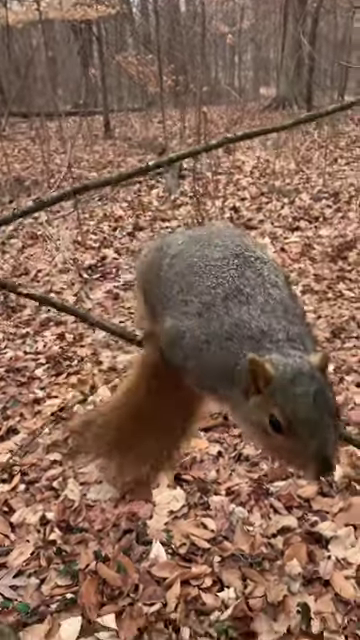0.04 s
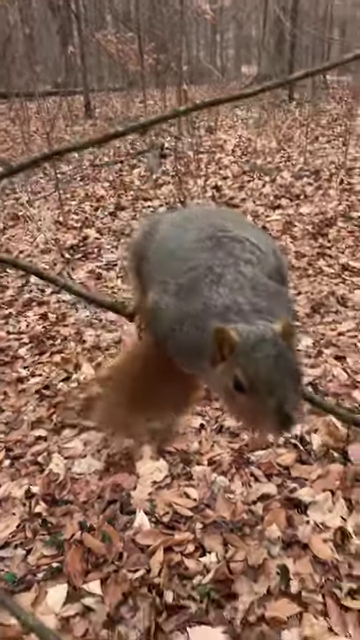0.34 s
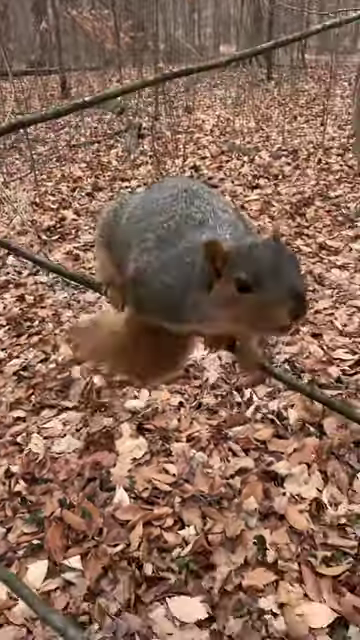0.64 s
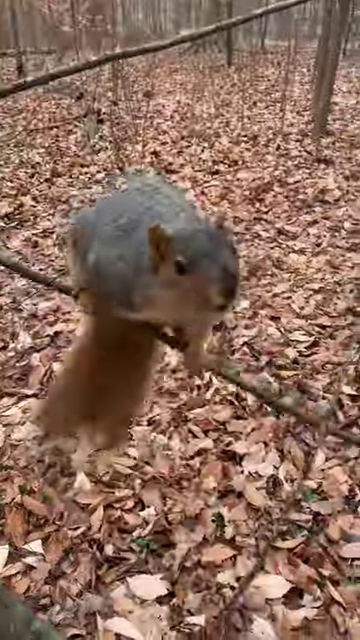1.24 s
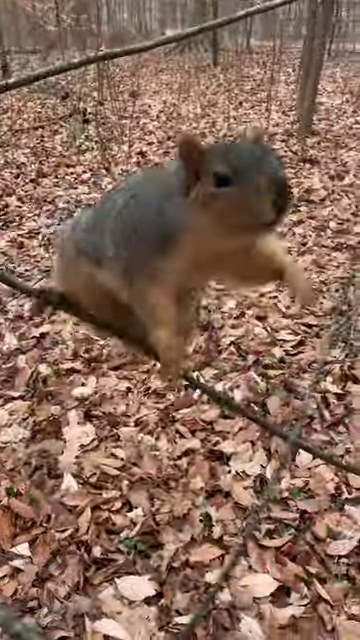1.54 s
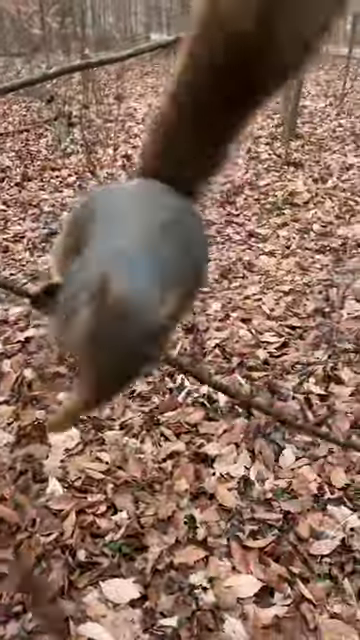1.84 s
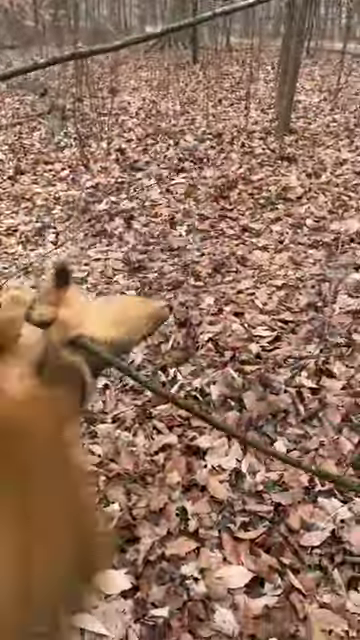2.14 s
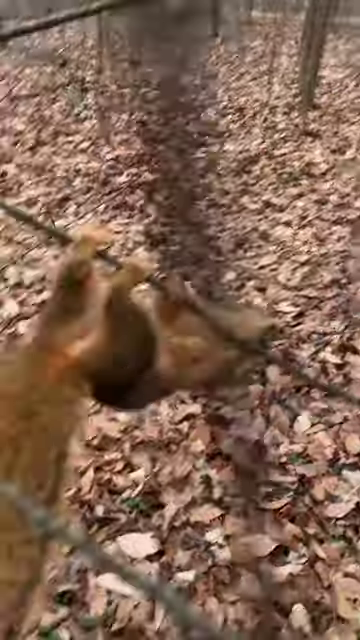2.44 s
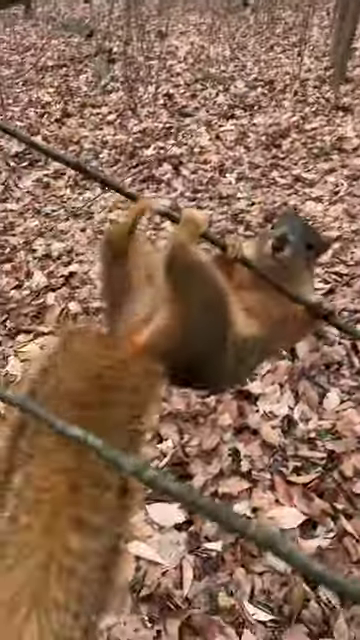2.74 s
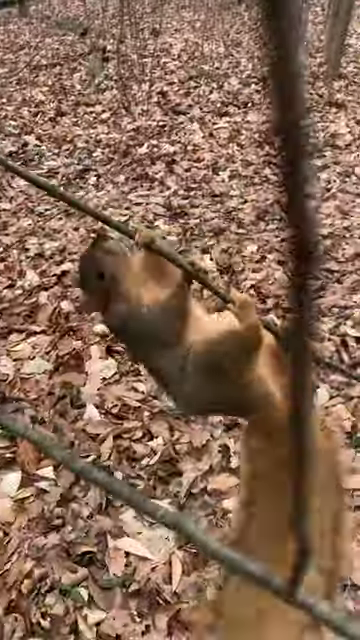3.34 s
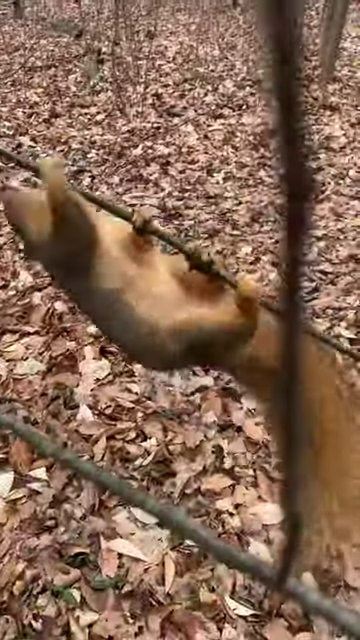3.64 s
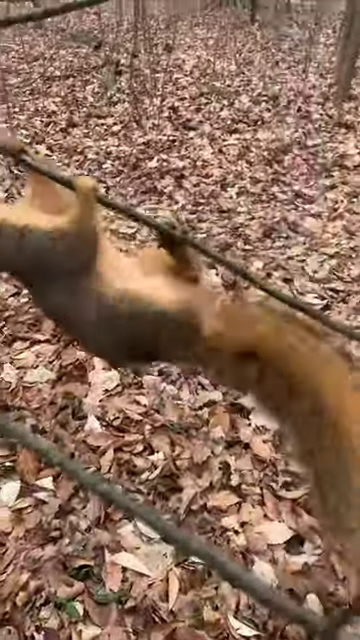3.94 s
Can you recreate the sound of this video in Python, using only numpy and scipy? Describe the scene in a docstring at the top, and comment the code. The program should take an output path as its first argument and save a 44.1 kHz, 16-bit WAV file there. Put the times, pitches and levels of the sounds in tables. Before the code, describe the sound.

A squirrel's claws tick and scrape on a thin branch close by, lightly at first, then in a sharp flurry with a woody knock, and once more later. Leaves rustle faintly and distant traffic rumbles through the forest.

```python
"""A squirrel scrambles along a thin branch close by. Its claws tick as they catch the bark,
its paws scrape and pat, bits of bark split, and its landing makes the wood ring with a knock.
Fur and dry leaves hiss faintly, and a thin rasp comes from the trees near the end.
Far traffic rumbles through the bare forest, and one engine drones in and out."""
import sys
import numpy as np
from scipy import signal
from scipy.fft import rfft, irfft, next_fast_len
from scipy.io import wavfile
from scipy.ndimage import uniform_filter1d, map_coordinates

SR = 44100
rng = np.random.default_rng(int(sys.argv[2]) if len(sys.argv) > 2 else 0)


def persist_wave(psi):
    """Save psi, clipped to +-1, as 16-bit WAV."""
    counts = np.round(np.clip(psi, -1, 1) * 32767).astype(np.int16)
    wavfile.write(sys.argv[1], SR, np.atleast_2d(counts).T)


N = 176400  # 4 seconds

# Below, t is time, f is frequency and t60 is the time a sound takes to fade by 60 dB.
# Bark noise has three parts: a bright snap, a woody body and a glassy edge. Levels are relative.
# claws catching the bark (t/s, snap/dB, body/dB, edge/dB, t60/s)
CLAW_TICKS = [(.617, -60, -44.5, -63.5, .03), (1.11, -45, -48, -37.5, 0.016),
              (1.655, -43.5, -48, -65, 0.039), (1.688, -45, -43, -68, 0.029), (1.8574, -29, -39, -43, 0.02),
              (1.8964, -40, -24, -52.5, 0.018), (1.9257, -35, -47, -51, .015),
              (1.9432, -17.5, -29.5, -18.5, .017), (1.9852, -18.5, -24, -30, 0.017),
              (2.1328, -36, -45.5, -43, 0.021), (2.296, -47, -52, -46.5, 0.022),
              (2.3095, -45.5, -55, -40.5, .02), (2.361, -38, -47, -42, 0.014),
              (2.388, -41.5, -60, -43.5, 0.025), (2.4374, -31.5, -51, -39.5, .009),
              (2.477, -37, -53, -44, 0.045), (2.575, -41, -59, -41.5, 0.018), (2.6053, -28, -60, -36, 0.02),
              (2.6086, -38, -60, -42, .025), (2.625, -36.5, -47, -47, .025),
              (2.635, -38.5, -55, -46, 0.021), (2.696, -46.5, -55, -44.5, 0.055),
              (3.0107, -29.5, -30, -36, .012), (3.072, -37.5, -37, -52, 0.05),
              (3.0942, -16.5, -22.5, -40.5, 0.0094), (3.443, -44.5, -60, -64, .012),
              (3.464, -46.5, -57, -60, 0.011), (3.5445, -45, -70, -60, 0.013),
              (3.844, -47, -66, -65, 0.013)]
# notes a claw rings on, with levels relative to its snap (f/Hz, level/dB, t60/s)
CLAW_NOTES = [(7400, -14, 0.017), (8750, -3, 0.006), (9500, -13, 0.026)]
# paws sliding over bark (t/s, length/s, snap/dB, body/dB, edge/dB, t60/s)
PAW_SLIDES = [(0.583, 0.031, -67, -51, -68, .15), (1.097, 0.023, -59, -50.5, -66, 0.081),
              (1.225, 0.036, -63, -53.5, -70, 0.16), (1.411, 0.014, -65, -55, -75, .06),
              (1.682, .023, -59, -55, -76, .1), (1.852, 0.015, -51, -41, -55.5, .07),
              (1.881, 0.028, -52.5, -36.5, -50, 0.095), (1.962, 0.044, -48, -41.5, -50.5, .08),
              (2.129, 0.0092, -45, -47, -47, .051), (2.218, 0.025, -52.5, -52, -70, .084),
              (2.291, .045, -57, -71, -52, 0.29), (2.382, 0.024, -54, -50.5, -51, .06),
              (2.442, 0.046, -49, -47.5, -57, 0.13), (2.6, 0.057, -50.5, -47, -46.5, 0.17),
              (2.812, 0.0087, -49.5, -69, -53, 0.041), (3.0109, 0.014, -30, -31.5, -36, 0.077),
              (3.043, 0.039, -49, -43, -43.5, 0.11), (3.091, 0.014, -32, -30, -35.5, 0.057),
              (3.12, 0.0079, -53, -56.5, -48.5, 0.066), (3.197, 0.022, -51, -55, -75, .12),
              (3.429, 0.037, -59, -66, -71, .1), (3.832, 0.042, -58, -75, -82, .092)]
# tone colours of the three parts of bark noise (f/Hz, level/dB)
SNAP_COLOUR = [(2500, -32), (4000, -17), (5300, 4), (7000, 0.5), (8400, 4), (9600, -9), (11300, -8),
               (13000, -16.5), (15500, -19.5), (16500, -40.5)]
BODY_COLOUR = [(200, -22), (700, -9.5), (1300, -10), (2050, -0.5), (2450, -5.5), (3000, 2.5), (3650, -2),
               (4600, 1.5), (5600, 0), (7500, -29.5)]
EDGE_COLOUR = [(7000, -17), (10000, -4), (12500, -2), (14500, -2), (15800, -1), (16800, -10)]
# bark splitting under the hardest grips (t/s, f/Hz, level/dB, t60/s)
BARK_CRACKS = [(1.8962, 2830, -26, .035), (1.897, 3995, -18.5, 0.023), (1.925, 3150, -35, .025),
               (1.944, 4080, -21.5, 0.018), (1.9438, 8400, -12, 0.014), (1.9841, 3320, -20, 0.015),
               (2.696, 3140, -43, 0.035), (3.093, 3660, -21, 0.03), (3.101, 2850, -37, 0.056)]
# blows on the branch: landing, rebound, a later grab (t/s, level/dB, extra for low notes/dB)
BRANCH_BLOWS = [(1.8955, -11.5, 2.5), (1.9249, -21, -4), (3.095, -33.5, 5)]
# notes the branch makes as it bends back and forth (f/Hz, level/dB, t60/s)
BRANCH_NOTES = [(96.3, 11.5, 0.054), (152, 1, 0.094), (274.5, 3.5, 0.039), (787, -1.5, 0.047),
                (1310, -5, 0.031), (1833, -10.5, 0.013), (4085, -6, 0.0089)]
# soft paw pads set down on the wood (t/s, level/dB, t60/s)
PAD_STEPS = [(0.617, -32.5, .04), (2.1616, -28.5, 0.038), (3.011, -31.5, 0.057)]
# dull tone colour of a pad (f/Hz, level/dB)
PAD_COLOUR = [(40, -20), (110, -7), (250, 6.5), (400, 9.5), (800, 2.5), (1400, -4.5), (2100, -3),
              (3000, -15), (5000, -50), (8000, -52)]
# loudness of fur and dry leaves (t/s, treble/dB, upper mids/dB)
RUSTLE_LEVELS = [(0, -66, -54.5), (.55, -62, -57), (.68, -66.5, -49.5), (.8, -65, -57.5), (.88, -62, -50),
                 (1.05, -61, -55), (1.35, -63.5, -60.5), (1.82, -63.5, -53.5), (2.0, -53, -60),
                 (2.07, -57, -52), (2.17, -52.5, -50), (2.45, -55.5, -54), (2.55, -56, -51.5),
                 (2.85, -58, -55), (2.97, -61.5, -61), (3.13, -43.5, -49.5), (3.27, -55.5, -48.5),
                 (3.4, -59, -56.5), (3.73, -64.5, -52.5), (3.85, -69, -50.5), (4, -58, -52.5)]
# tone colours of the rustle's treble and upper mids (f/Hz, level/dB)
RUSTLE_TREBLE = [(2500, -32), (4000, 5), (5300, -1.5), (7000, 1.5), (8400, -1), (9600, -6.5), (11300, -9.5),
                 (13000, -10), (15500, -24.5), (16500, -23)]
RUSTLE_MIDS = [(1200, 3.5), (2200, 5), (3300, 3), (4200, -8), (5600, -27.5), (7500, -25.5)]
# narrow tone colour of the rasp (f/Hz, level/dB)
RASP_COLOUR = [(2300, -30), (2900, -9), (3100, -1), (3330, 0), (3500, -10), (4300, -30)]
# rise and fall of the road's rumble (t/s, level/dB)
RUMBLE_LEVELS = [(0, -26.5), (.13, -28.5), (.5, -29.5), (.9, -30.5), (1.5, -29.5), (1.7, -31.5), (2.1, -34),
                 (2.25, -32.5), (2.55, -29.5), (2.95, -32.5), (3.3, -29.5), (3.9, -30.5)]
# tone colours of the road's rumble and the tyres' roar (f/Hz, level/dB)
RUMBLE_COLOUR = [(14, -61), (21, -23.5), (46, -4), (76, 2.5), (150, -8.5), (173, -9.5), (198, -12.5),
                 (255, -22), (344, -25), (400, -35), (520, -43), (880, -120)]
TYRE_COLOUR = [(100, -16.5), (250, 3.5), (380, -2), (520, 2.5), (720, -1.5), (1000, -5), (1500, -9.5),
               (2000, -18.5), (2600, -30), (4000, -43.5), (5300, -90), (9000, -45.5)]
# the far engine's firing rate and loudness (t/s, f/Hz, level/dB)
ENGINE_RUN = [(0, 93.5, -38), (2.15, 96.74, -45), (2.3, 98.6, -35.5), (2.6, 101.7, -33.5),
              (2.67, 100.9, -25), (2.82, 104.4, -27), (2.86, 104.5, -45), (3.29, 104.4, -37.5),
              (3.335, 105.1, -29.5), (3.41, 105.2, -24), (3.495, 105.6, -22), (3.515, 106.3, -30),
              (3.57, 107.1, -24), (3.83, 108.1, -26.5), (3.92, 107.2, -23), (4, 100, -24.5)]
# the engine's tones at 1 to 5 times its firing rate (level/dB)
ENGINE_TONES = [0.5, -21, -30, -34, -34]
# how alike left and right are: 1 is the same, -1 is opposite (f/Hz, likeness)
NEAR_LIKENESS = [(500, 0.92), (1800, 0.92), (3000, -0.39), (4100, -0.12), (4800, -0.97), (5300, -0.99),
                 (5900, -0.87), (6500, 0.11), (7500, 1), (8500, 0.94), (9400, 0.96), (10300, -0.16),
                 (11400, -0.97), (12500, -0.064), (14000, 0.99), (15500, 0.75)]  # two microphone openings agree and cancel in turn as f rises
AIR_LIKENESS = [(60, 1), (125, 1), (250, 0.86), (500, 0.52), (1000, 0.5), (2500, 0.42), (4000, -0.3),
                (5300, -1), (8000, 0.53)]  # the same in the bass, less alike higher up


def claws():
    """Each claw slips briefly, then catches with a dry tick that rings for a moment."""
    snap, body, edge, ringing = np.zeros((4, N))
    for start, snap_db, body_db, edge_db, t60 in CLAW_TICKS:
        slip = gain(-12.5) * envelope(start, rise_s=0.0046, hold_s=0, t60=t60)
        catch = envelope(start, rise_s=0.00053, hold_s=0.0007, t60=t60)
        shape = slip + catch
        snap += gain(snap_db) * shape
        body += gain(body_db) * shape
        edge += gain(edge_db) * shape
        ringing += claw_ring(start, snap_db)
    return bark(snap, body, grain_db=-1.0) + edge * noise(EDGE_COLOUR, NEAR_LIKENESS) + ringing


def claw_ring(start, snap_db):
    """A struck claw rings on a few high, fading notes, a little different each time."""
    out = np.zeros(N)
    t = np.arange(SR // 25) / SR
    for hz, level_db, t60 in CLAW_NOTES:
        detune, size_db = rng.standard_normal(2) * [0.0098, 2]
        fade = gain(snap_db + level_db + size_db) * np.exp(-np.log(1000) * t / t60)
        out[round(start * SR):][:len(t)] += fade * np.sin(2 * np.pi * hz * (1 + detune) * t)
    return out


def scrapes(grain_db=3.2):
    """Sliding paws tear a dense run of grains and small flakes from the bark."""
    snap, body, edge = np.zeros((3, N))
    for start, length, snap_db, body_db, edge_db, t60 in PAW_SLIDES:
        shape = envelope(start, rise_s=0.002, hold_s=length, t60=t60)
        snap += gain(snap_db) * shape
        body += gain(body_db) * shape
        edge += gain(edge_db) * shape
    crumbs = gain(0.5) * bark(snap, body, grain_db)
    glassy = edge * noise(EDGE_COLOUR, NEAR_LIKENESS, grain_db)
    return crumbs + glassy + gain(-0.5) * snap * flakes()


def bark(snap, body, grain_db):
    """Bark crumbles with a bright snap and a woody body, each following its own loudness curve."""
    bright = noise(SNAP_COLOUR, NEAR_LIKENESS, grain_db)
    woody = patchy(noise(BODY_COLOUR, NEAR_LIKENESS, grain_db))
    return snap * bright + body * woody


def flakes(per_second=230, spread_db=2.5):
    """Single flakes of bark break off at random, each a click of its own size."""
    breaks = rng.random(N) < per_second / SR
    sizes = gain(spread_db * rng.standard_normal(N))
    clicks = breaks * sizes * rng.choice([-1, 1], N)
    colour = lambda hz: gain(look_up(SNAP_COLOUR, hz)) + gain(look_up(BODY_COLOUR, hz) - 2)
    left_right = lambda hz: np.exp(np.array([[1j], [-1j]]) * stereo_angle(NEAR_LIKENESS, hz))
    return normalise(filtered(clicks, lambda hz: colour(hz) * left_right(hz)))


def cracks():
    """Each splitting piece of bark rings briefly on one woody note."""
    t = np.arange(N) / SR
    out = np.zeros(N)
    for start, hz, db, t60 in BARK_CRACKS:
        shape = gain(db) * envelope(start, rise_s=0.00028, hold_s=0, t60=t60)
        out += shape * np.sin(2 * np.pi * hz * (t - start))
    return out


def branch_knocks(low_below_hz=400, travel_at_100_hz_s=0.00443):
    """Each blow bends the branch and makes it ring. High notes travel faster and arrive first."""
    out = np.zeros((2, N))
    lag_rad = np.array([[0.68], [0]])  # the knock reaches the left side after the right
    t = np.arange(SR // 4) / SR
    for start, blow_db, low_db in BRANCH_BLOWS:
        for hz, note_db, t60 in BRANCH_NOTES:
            arrival = round((start + travel_at_100_hz_s * np.sqrt(100 / hz)) * SR)
            strength = gain(blow_db + note_db + low_db * (hz < low_below_hz))
            rise = 1 - np.exp(-t * hz)
            fade = np.exp(-np.log(1000) * t / t60)
            tone = np.sin(2 * np.pi * hz * t - lag_rad)
            out[:, arrival:arrival + len(t)] += strength * rise * fade * tone
    return out


def pads():
    """Soft paw pads land with dull pats."""
    pats = sum(gain(db) * envelope(start, rise_s=0.001, hold_s=0.003, t60=t60)
               for start, db, t60 in PAD_STEPS)
    return pats * noise(PAD_COLOUR, AIR_LIKENESS)


def rustle():
    """Fur and dry leaves hiss softly, with a slight flutter."""
    treble_db, mids_db = time_curves(RUSTLE_LEVELS)
    flutter_db = 0.65 * wobble(40)
    treble = patchy(noise(RUSTLE_TREBLE, NEAR_LIKENESS, grain_db=0.5))
    mids = patchy(noise(RUSTLE_MIDS, NEAR_LIKENESS, grain_db=1.5))
    return gain(treble_db + flutter_db) * treble + gain(mids_db + flutter_db) * mids


def rasp():
    """A thin, faint rasp comes from somewhere in the trees."""
    shape = envelope(start=3.75, rise_s=0.012, hold_s=0.25, t60=0.2)
    return gain(-55 + wobble(28)) * shape * noise(RASP_COLOUR, AIR_LIKENESS)


def traffic():
    """A far road carries a low rumble, the roar of tyres and one engine."""
    swell_db = time_curves(RUMBLE_LEVELS)[0]
    rumble = gain(swell_db + 1.07 * wobble(7.6)) * noise(RUMBLE_COLOUR, AIR_LIKENESS)
    tyres = gain(-41 + 2.05 * wobble(5.373)) * noise(TYRE_COLOUR, AIR_LIKENESS)
    return (rumble + tyres + engine()) * gain([[-1.23], [1.23]])  # a little to the right


def engine(waver_db=0.8):
    """An engine fires so fast that it drones, with wavering tones at multiples of its firing rate."""
    firing_hz, level_db = time_curves(ENGINE_RUN)
    phase = 2 * np.pi * np.cumsum(firing_hz * (1 + 0.0077 * wobble(14))) / SR
    return sum(gain(level_db + tone_db + waver_db * wobble(12)) * np.sqrt(2) * np.sin(multiple * phase)
               for multiple, tone_db in enumerate(ENGINE_TONES, 1))


def patchy(sound, width_hz=170, length_s=0.06, depth_db=4.5):
    """Random, shifting boosts and cuts in narrow bands make the bark noise and hiss sound patchy."""
    hz, times, spectrum = signal.stft(sound, SR, nperseg=512)
    patches = rng.standard_normal(spectrum.shape[1:])
    patches = uniform_filter1d(patches, round(width_hz / hz[1]), axis=0)
    patches = uniform_filter1d(patches, round(length_s / times[1]), axis=1)
    _, coloured = signal.istft(spectrum * gain(depth_db * normalise(patches)), nperseg=512)
    return normalise(coloured[:, :N])


def noise(colour, likeness, grain_db=0):
    """Stereo noise of strength 1; grain_db breaks it into tiny grains of uneven size."""
    grains = rng.standard_normal((2, N)) * gain(grain_db * wobble(700))

    def response(hz):
        angle = stereo_angle(likeness, hz)
        return gain(look_up(colour, hz)) * [np.cos(angle), np.sin(angle)]

    shared, opposite = filtered(grains, response)
    return normalise(np.array([shared + opposite, shared - opposite]))


def stereo_angle(likeness, hz):
    """Turn left-right likeness into an angle: 0 for the same, pi / 2 for opposite."""
    return np.arccos(np.clip(look_up(likeness, hz), -1, 1)) / 2


def envelope(start, rise_s, hold_s, t60):
    """A loudness curve that swells up to the start time, holds, then dies away."""
    t = np.arange(N) / SR - start
    rise = np.minimum(t, 0) / rise_s
    fall = np.log(1000) * np.maximum(t - hold_s, 0) / t60
    return np.exp(np.maximum(rise - fall, -20))


def wobble(rate):
    """A smooth curve through random points, `rate` of them each second."""
    points = rng.standard_normal(int(N * rate / SR) + 4)
    return map_coordinates(points, [np.arange(N) * rate / SR])


def filtered(sound, response):
    """Multiply each frequency in a sound by response(hz)."""
    size = next_fast_len(N + SR // 2)
    hz = np.fft.rfftfreq(size, 1 / SR)
    return irfft(rfft(sound, size) * response(hz), size)[..., :N]


def look_up(table, hz):
    """Read between the rows of a frequency table, on a log scale."""
    row_hz, values = np.transpose(table)
    return np.interp(np.log(hz + 1), np.log(row_hz + 1), values)


def time_curves(table):
    """Join the rows of a time table with straight lines: one curve for each column after the time."""
    times, *columns = np.transpose(table)
    return [np.interp(np.arange(N) / SR, times, column) for column in columns]


def gain(db):
    """Turn decibels into a number to multiply by."""
    return 10 ** (np.asarray(db) / 20)


def normalise(x):
    """Scale to an average strength (rms) of 1."""
    return x / np.sqrt(np.mean(x ** 2) + 1e-20)


def scene():
    """The squirrel close by, with the forest and the road behind it."""
    squirrel = claws() + cracks() + scrapes() + pads() + branch_knocks()
    return squirrel + rustle() + rasp() + traffic()


def record(dry, top_hz=16500):
    """Cut off the very highest treble."""
    return filtered(dry, lambda hz: hz < top_hz)


dry = scene()
out = record(dry)
persist_wave(out)
```